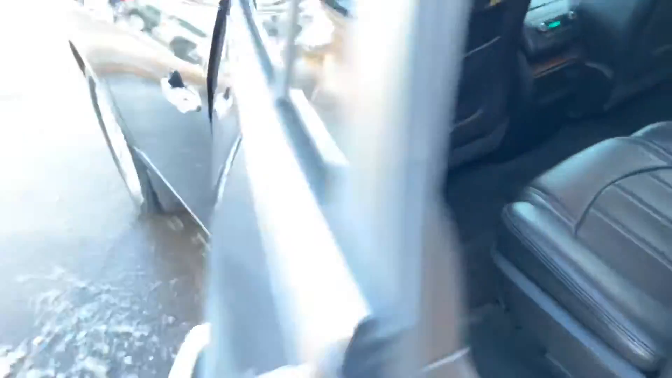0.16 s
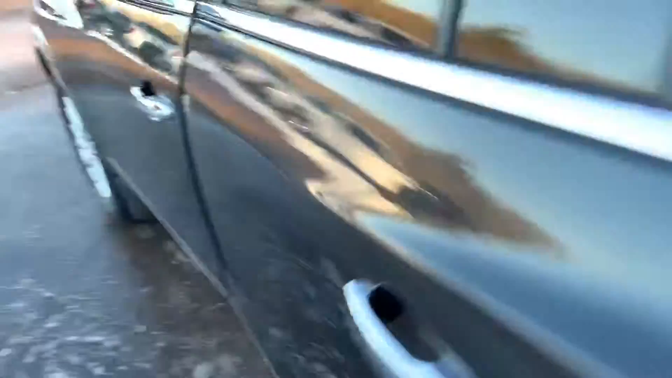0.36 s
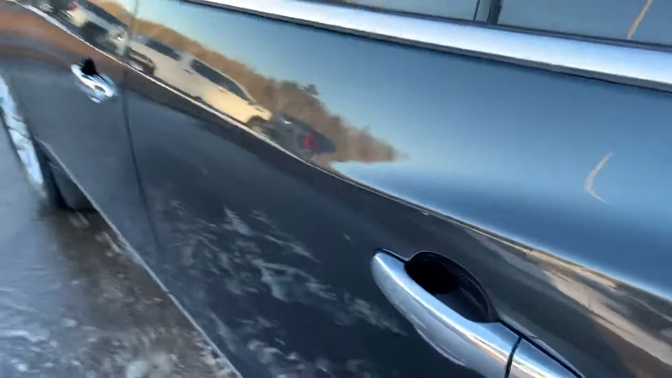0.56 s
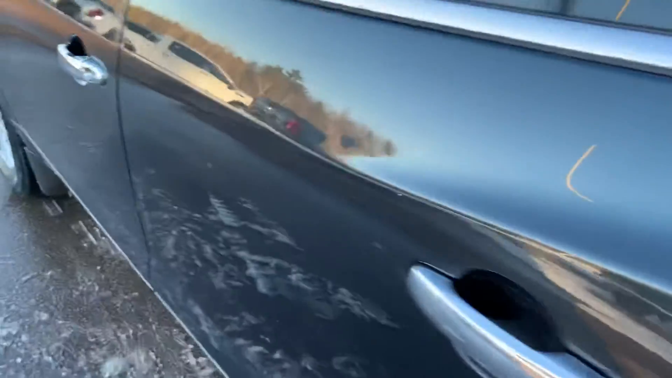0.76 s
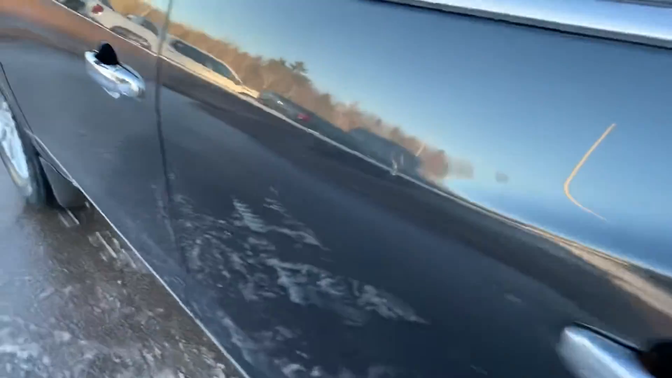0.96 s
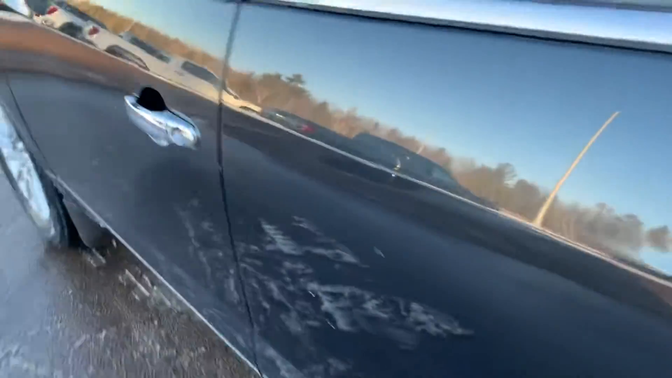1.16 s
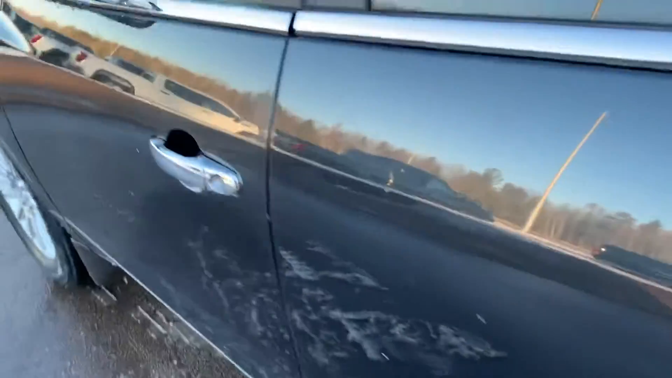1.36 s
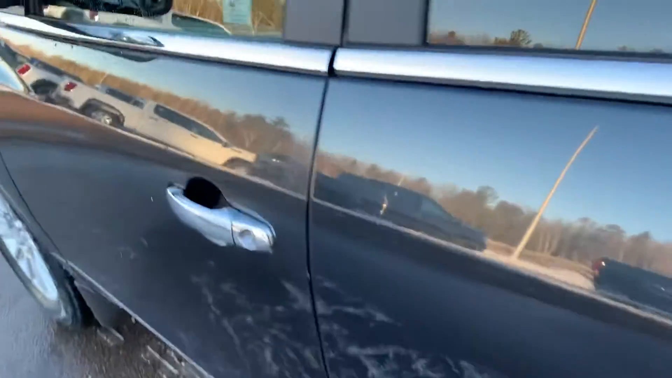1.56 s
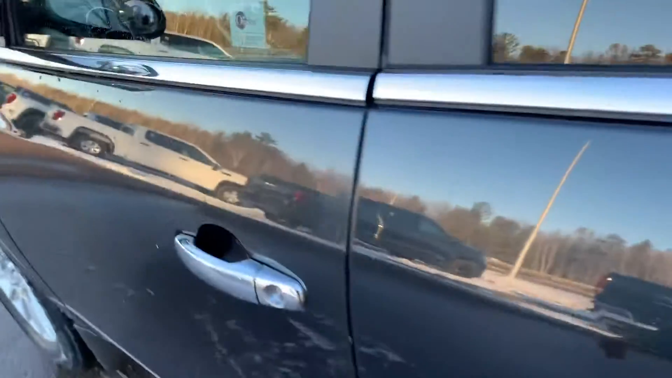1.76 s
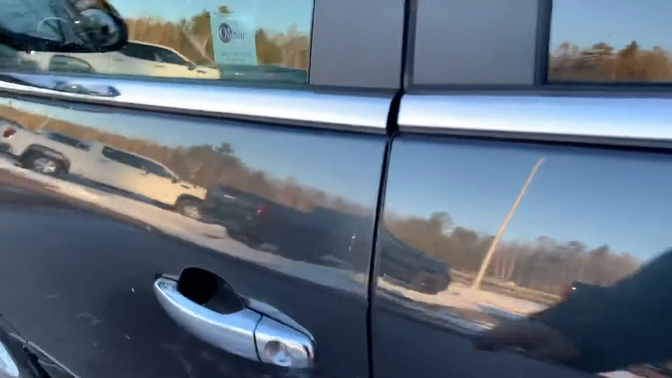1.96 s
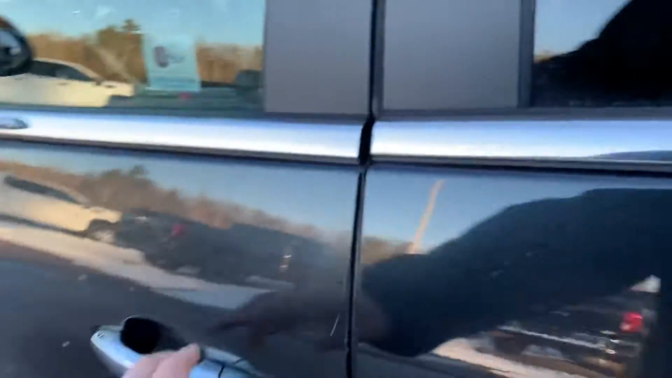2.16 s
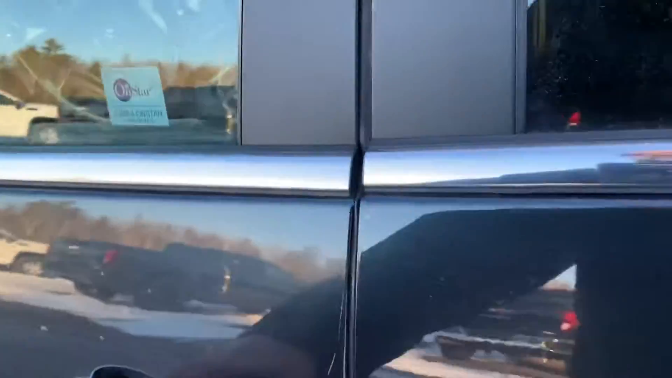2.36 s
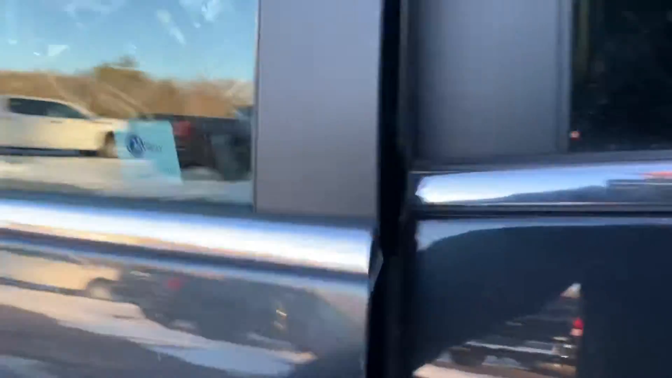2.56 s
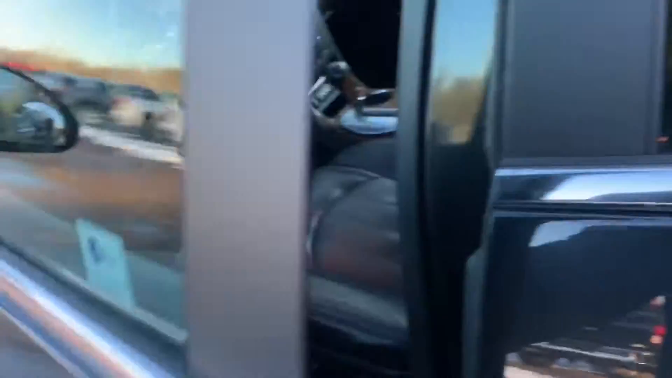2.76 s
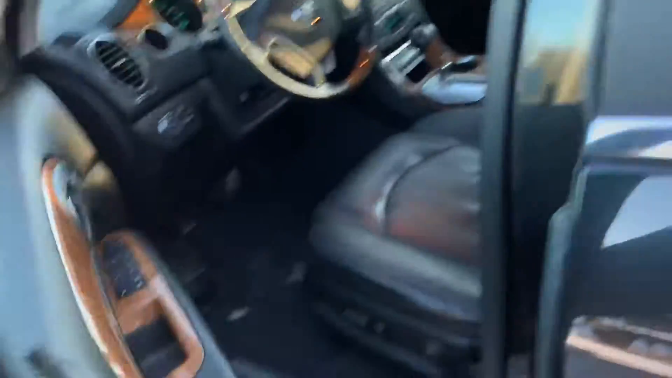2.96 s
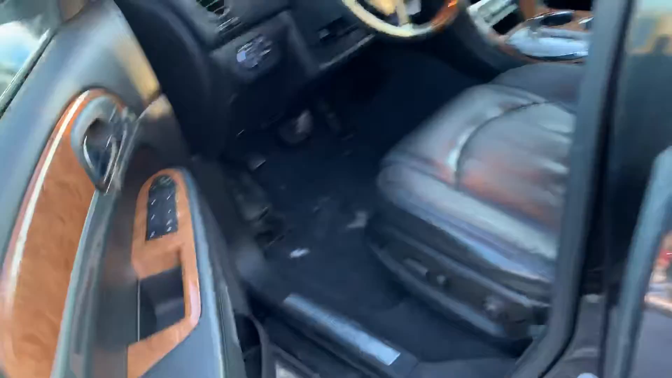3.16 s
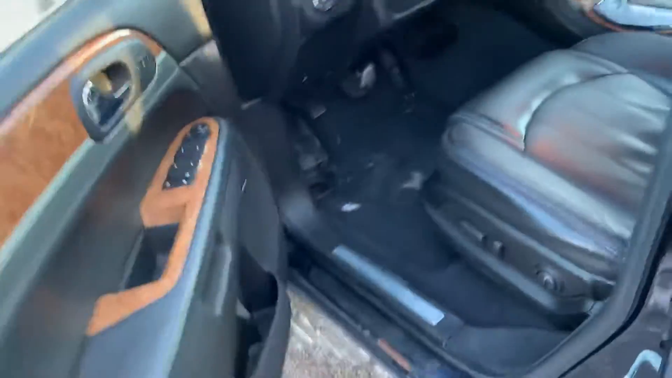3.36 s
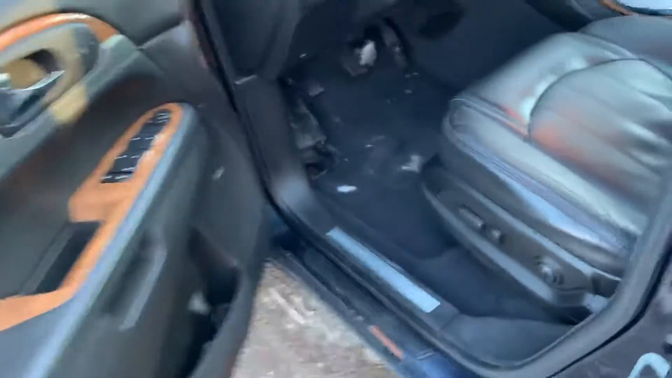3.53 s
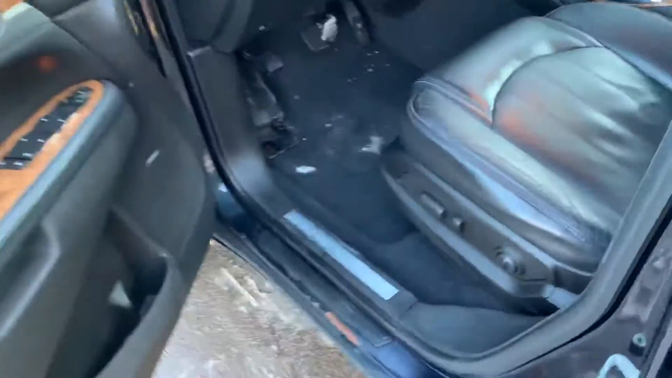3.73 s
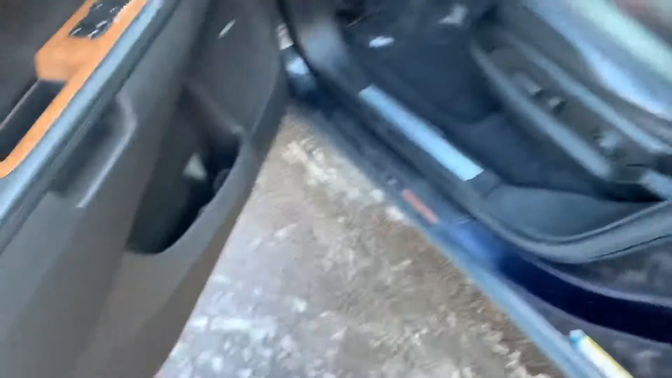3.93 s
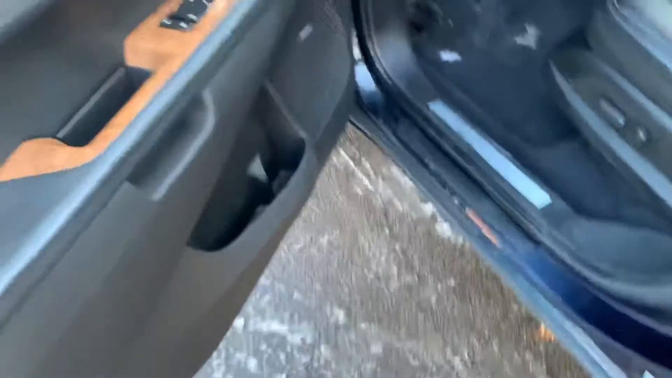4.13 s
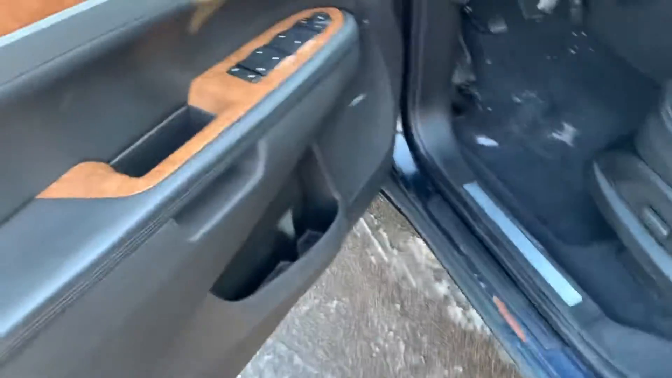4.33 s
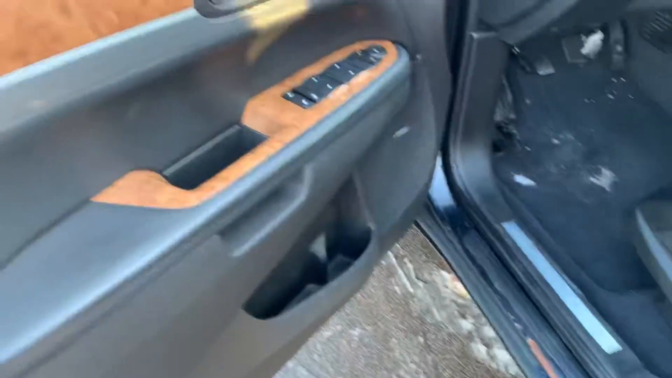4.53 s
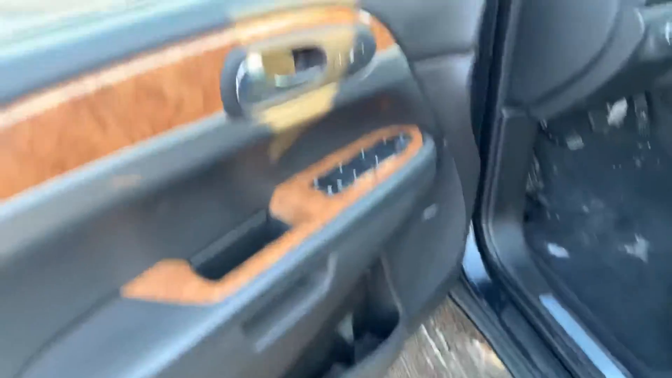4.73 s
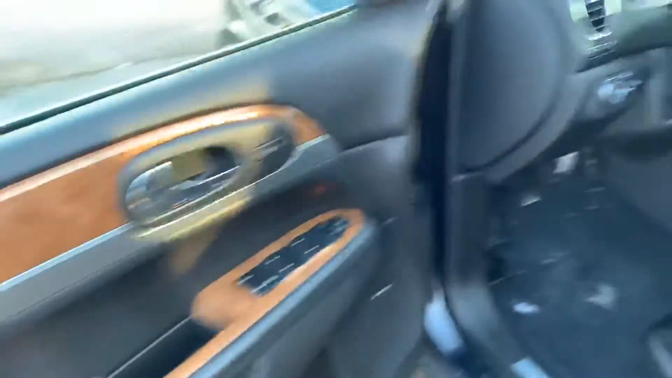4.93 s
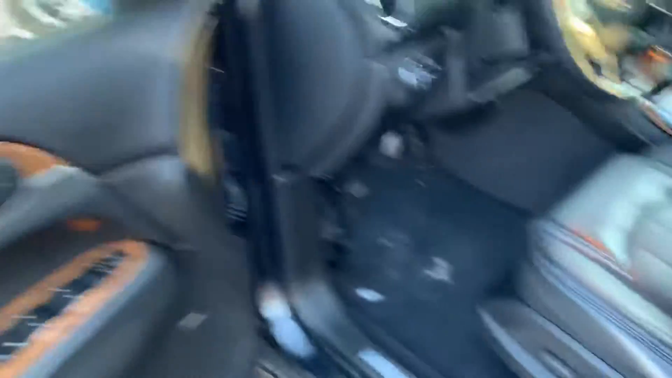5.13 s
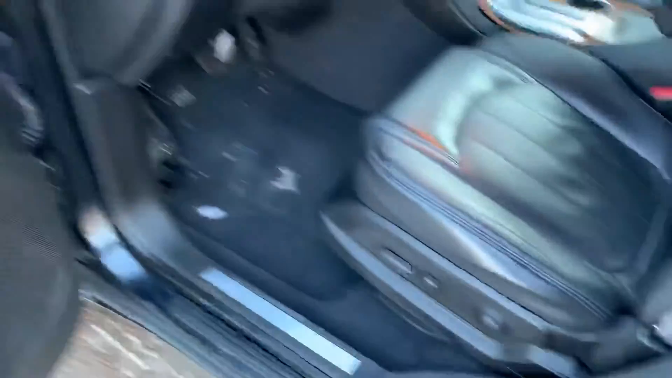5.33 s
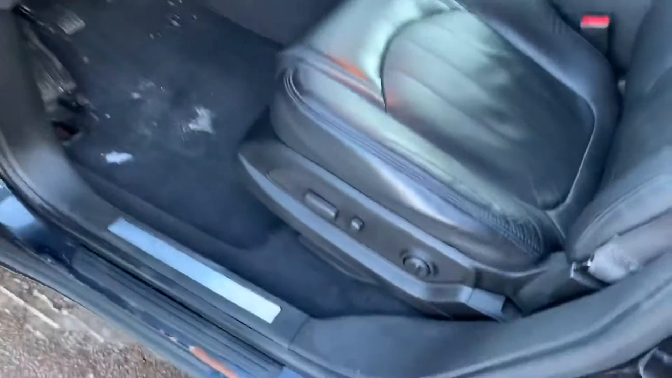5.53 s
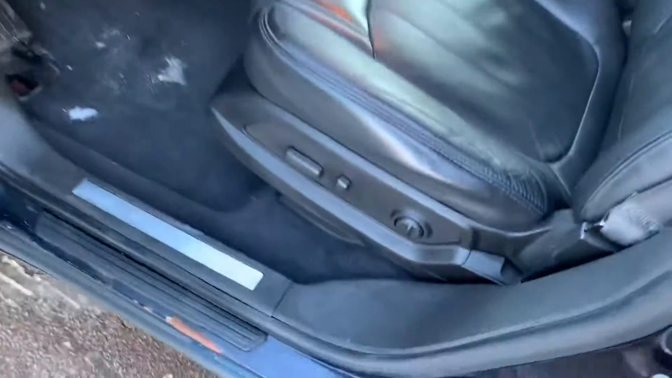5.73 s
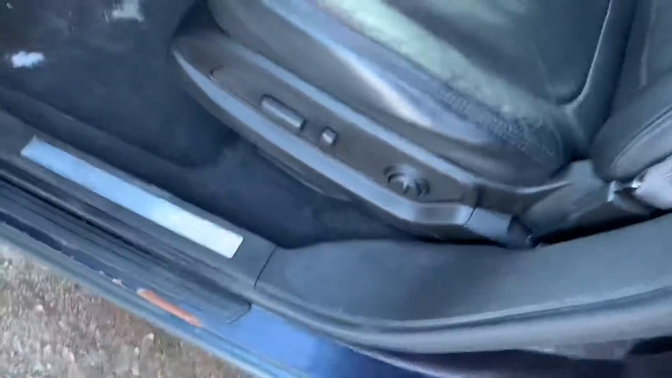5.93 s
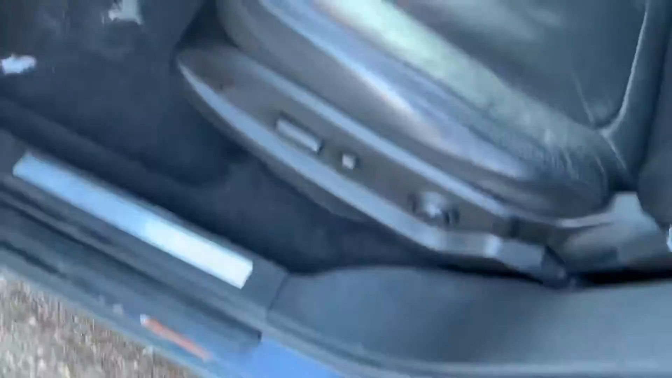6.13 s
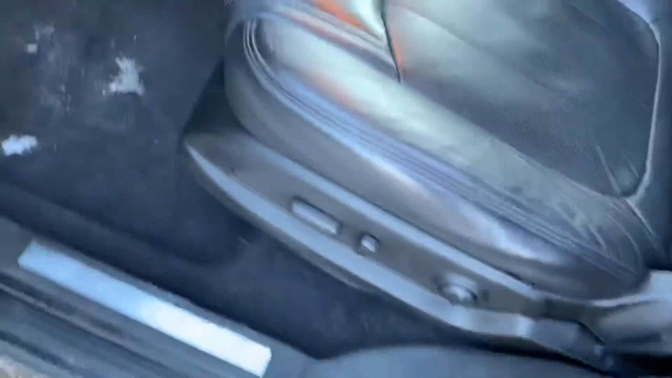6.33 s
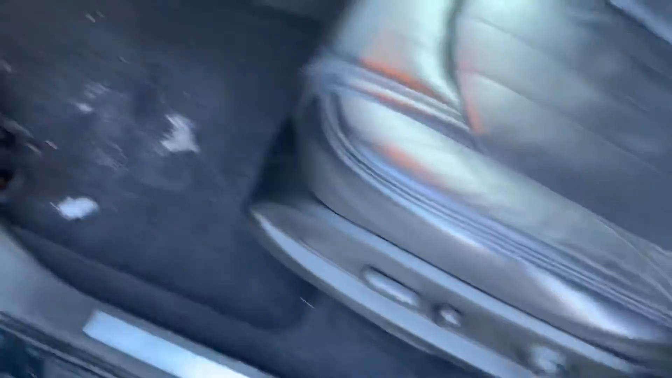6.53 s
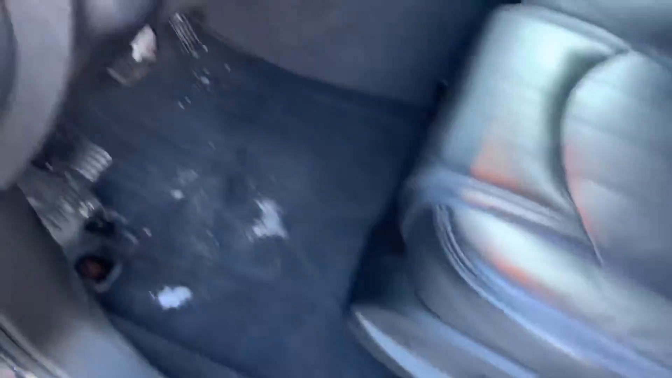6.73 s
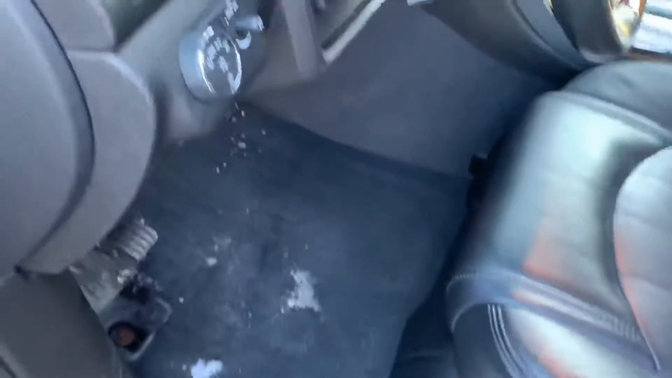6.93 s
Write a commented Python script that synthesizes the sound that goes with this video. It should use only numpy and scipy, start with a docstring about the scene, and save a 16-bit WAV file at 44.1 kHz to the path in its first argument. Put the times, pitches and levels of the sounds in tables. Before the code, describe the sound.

Over a low outdoor traffic rumble, one car door shuts heavily and another clicks open, followed by soft shoe and sleeve rustles.

```python
"""Far-off traffic rumbles and keys tick, then a car's rear door slams in an outdoor car park.
Each blow of the slam makes the door thud, ring and crack, and the car rebounds with a low boom.
Two seconds later the front door's steel latch snaps, the door swings open and the traffic booms
in the cabin. Shoes and sleeves rub and scuff. A phone beside the car hears it all in stereo."""
import sys
import numpy as np
from scipy import signal
from scipy.fft import rfft, irfft, next_fast_len
from scipy.io import wavfile
from scipy.ndimage import uniform_filter1d

SR = 44100
rng = np.random.default_rng(int(sys.argv[2]) if len(sys.argv) > 2 else 0)


def wrap_up_sound(samples):
    """Save the sound to the file named by the first command line argument, as 16-bit audio."""
    columns = np.atleast_2d(samples).T
    # keep every value between -1 and 1, then stretch to whole-number steps
    tamed = np.clip(columns, -1, 1)
    steps = np.round(tamed * 32767).astype(np.int16)
    wavfile.write(sys.argv[1], SR, steps)


N = 312357

# Blows on the doors. Each row: start in seconds, thud, panel ring, crack and the crack's extra
# treble in dB, favoured ring pitch in Hz, contact time in seconds.
DOOR_BLOWS = [(0.4896, -13, -14, -26, -11, 1400, 0.0023), (0.4953, -6.5, -6, -25, -10, 600, 0.0028),
              (0.4999, -16, -8, -21.5, -13, 1400, 0.0017), (0.504, -4, -0.5, -21, -6, 684, 0.0021),
              (0.508, -1.5, 3, -19, -2, 501, 0.0022), (0.514, -24, -13, -13.5, -1, 533, 0.0014),
              (0.521, -28, -24, -32, 2, 592, 0.0029), (0.535, -5, -12, -23, -12, 501, 0.0014),
              (0.5401, -18, -6, -30, -7, 480, 0.002), (0.5481, -11.5, -22, -37, 1, 638, 0.002),
              (0.5651, -20, -10, -30, -6, 1460, 0.00063), (0.583, -33, -27, -42, -1, 1500, 0.0025),
              (2.415, -27, -23, -45, 0, 900, .0015), (2.431, -18.5, -38, -49, 0, 530, 0.0024),
              (2.461, -10, -20, -54, 2, 500, 0.0026), (2.4656, -24, -15, -35, -13, 750, 0.0014),
              (2.472, -27, -24, -45, -4, 700, 0.0019), (2.484, -16.5, -29, -55, 0, 608, 0.0023),
              (2.519, -22, -35, -58, -2, 900, 0.0022), (2.9319, -21.5, -18, -50, 4, 560, 0.0025),
              (2.945, -22.5, -22, -54, 0, 500, 0.0042)]
# Cabin air and car body bouncing back. Each row: start in seconds, pitch in Hz, level in dB,
# seconds to swell, seconds to fade by 60 dB if the springs did not stop it.
REBOUNDS = [(.523, 58.3, 5, 0.051, 0.3), (0.521, 70.7, -0.5, 0.016, 0.25)]
# Snaps of the latch and the arm that holds the door. Each row: start in seconds, low ring,
# high ring, top ring and crack in dB, contact time in seconds.
LATCH_SNAPS = [(2.5517, -30, -38, -50, -43, 0.0031), (2.5745, -24, -21, -40, -35, 0.0025),
               (2.5827, -14.5, -18, -37, -28.5, 0.0019), (2.593, -17, -24, -50, -30, 0.00172),
               (2.926, -19, -15, -18.5, -22.5, 0.00097), (2.9317, -12.5, -15, -23, -25, 0.0011),
               (2.9357, -18, -35, -38, -37, 0.0018)]
# The tones each part rings with. Each row: pitch in Hz, level in dB, seconds to fade by 60 dB.
SHELL_TONES = [(115.5, 13.5, 0.19), (145.3, 7, 0.13), (170.3, 0, 0.21), (207, 5, 0.14), (280, 5.5, 0.19),
               (326, 0.5, 0.15), (377, -3.5, 0.11), (471, 2.5, 0.022), (512, -2.5, 0.044), (656, 1, 0.038)]
PANEL_TONES = [(430, -3, 0.035), (463, -1, 0.028), (600, 6.5, 0.041), (660, -3, .03), (730, -6, 0.024),
               (882, 4.5, 0.036), (1070, 7, 0.023), (1360, 9, 0.022), (1524, 12, 0.015), (1720, 3, 0.017),
               (1850, 1, 0.016), (2040, -6, 0.024), (2320, -16.5, 0.028), (2860, -9, 0.0084),
               (2920, -8, 0.012)]
LATCH_LOW_TONES = [(210.5, 4, 0.13), (433, -5, 0.019), (686, -7, 0.026), (950, 5, 0.024), (1066, 12, 0.016)]
LATCH_HIGH_TONES = [(1530, 4.5, 0.019), (1740, -3, 0.013), (1970, 4, 0.02), (2080, 4, 0.022),
                    (2530, 3.5, 0.014)]
LATCH_TOP_TONES = [(3500, -3, .008), (4150, -2, .008), (4700, 0, 0.008), (5450, -6, .008), (6190, -2, .008),
                   (6900, 1, 0.007)]
# Keys and plastic. Each row: start in seconds, jingle in dB, its pitch in Hz, treble and body in dB.
KEY_TICKS = [(0.0702, -36, 3870, -36.5, -60), (0.096, -35, 3880, -39, -60), (0.1265, -34, 4000, -38.5, -60),
             (0.1406, -38, 3800, -38, -60), (2.1863, -28, 3450, -44, -40), (2.216, -35, 4170, -48, -44),
             (2.2225, -36, 3500, -52, -40), (2.227, -41, 3500, -55, -46), (2.242, -37, 3700, -52, -50),
             (2.249, -30, 3800, -46, -42), (2.257, -32, 3500, -50, -50), (2.262, -36, 3900, -48, -50),
             (2.2732, -30, 3420, -29, -44), (2.282, -34, 3800, -34, -50), (2.287, -37, 3800, -44, -50),
             (2.2918, -25, 3650, -33, -38), (2.4, -43, 3600, -38, -50), (3.7646, -34, 3470, -47, -55),
             (6.583, -29, 3360, -37, -42)]
# Shoes and sleeves. Each row: start, rise, hold and fall in seconds, level of the airy sheen in dB,
# rasp and crunch in dB compared with the sheen, crunch pitch in Hz.
RUBS = [(0.226, 0.033, 0.13, 0.037, -47, -5, -9, 2120), (0.766, 0.0089, 0.078, .02, -49.5, -8, -4.5, 2000),
        (0.967, 0.0072, 0.098, 0.038, -47.5, -4.5, -9, 1960),
        (1.087, 0.026, 0.09, 0.059, -55, -2.5, 4, 1600), (1.631, 0.016, 0.064, 0.097, -43, -3.5, -3, 2030),
        (1.682, 0.018, 0.049, 0.014, -60, 6, 2, 2000), (1.775, 0.038, 0.049, 0.022, -47.5, -4, -21, 2000),
        (2.087, 0.011, 0.014, 0.025, -34, -3.5, -1.5, 1700),
        (2.103, 0.0094, 0.026, 0.044, -32.5, -2.5, -5.5, 2330),
        (2.193, 0.037, 0.06, 0.031, -49, 2, -5, 1700), (2.292, 0.012, 0.026, 0.075, -48.5, 0, -1, 1800),
        (2.344, 0.057, .008, .03, -51.5, 3.5, -5, 2010), (2.436, .012, .008, 0.044, -46.5, -6, -10, 2000),
        (3.043, 0.063, 0.52, .3, -69.5, -7, 20.5, 1210), (3.262, 0.092, .02, .14, -47.5, 0.5, -10, 1400),
        (3.53, .04, .08, .06, -69, -3, 19, 1240), (4.596, 0.12, 0.055, 0.47, -57.5, 3, -4, 2000),
        (5.737, 0.024, 0.027, 0.023, -34.5, -2.5, -4, 1400),
        (5.799, 0.012, 0.013, 0.032, -43.5, 1, 6, 1430), (5.904, 0.033, 0.089, .02, -51.5, -3, -2, 2430),
        (6.035, 0.013, 0.031, 0.13, -48, -5, -11, 2020), (6.49, 0.025, 0.009, 0.044, -46, -9, -2, 2040),
        (6.563, 0.031, .015, 0.19, -47, 3, 2.5, 2120), (6.93, 0.035, 0.05, .04, -47, -5, -14, 2000)]
# The crunch of a scuff. Each row: multiple of the crunch pitch, level in dB.
CRUNCH_SHAPE = [(.5, -10), (.68, -5), (.8, -1), (.9, 1), (1, 4), (1.15, -3), (1.28, -6), (1.45, -8)]
# Tone colours of the nearby noises. Each row: frequency in Hz, relative level in dB.
CRACK_COLOUR = [(2200, 8), (2900, 1), (3800, 4.5), (4500, 1.5), (5500, -3.5), (7000, 0), (11000, -2.5),
                (16500, -2)]
ECHO_COLOUR = [(300, -0.5), (900, -7.5), (2500, -6), (4300, -5), (8000, -14), (16000, -20)]
TICK_TREBLE_COLOUR = [(4500, 2), (7000, 3), (16500, -4.5)]
TICK_BODY_COLOUR = [(900, 2), (1500, -5), (2500, -4)]
SHEEN_COLOUR = [(6500, -21), (8200, -2.5), (12000, -1.5), (16500, -1.5)]
RASP_COLOUR = [(3300, 2.5), (3800, 1.5), (4250, 2.5), (4800, -5.5), (5900, -8), (6400, -7), (6900, -3),
               (8200, -20)]
# Tone colours of the six traffic layers. Each row: frequency in Hz, relative level in dB.
RUMBLE_COLOUR = [(22, -19), (40, -9), (68, 0), (100, -1.5), (140, -18.5), (220, -43)]
LOW_BOOM_COLOUR = [(85, -3.5), (110, 1.5), (165, 3), (210, -5.5), (270, -16.5)]
CABIN_COLOUR = [(170, -9), (220, 2), (280, 0), (340, -2.5), (400, -7.5), (520, -18)]
ROAR_COLOUR = [(300, -19), (500, 0), (700, -3), (1000, -8.5), (1400, -5), (1900, -10), (2500, -13.5),
               (3300, -22), (5000, -22), (6500, -39)]
WHINE_COLOUR = [(650, -3.5), (800, 0), (880, 0), (945, 3), (1010, -3.5), (1200, -8)]
HISS_COLOUR = [(2000, 8), (5000, -5), (6800, -1), (7600, -8.5), (8200, -6), (12000, -7.5), (16500, -5.5)]
# Those layers in order. Each row: dB with doors shut, dB added by an open rear and an open front door.
TRAFFIC_LEVELS = [(-32, -8, -3.5), (-40.5, 13.5, 5), (-49, 6.5, 11), (-47, -3, 5.5), (-43.5, -3.5, -2),
                  (-56, -7.5, 7.5)]
# How the traffic changes. Each row: time in seconds, rear and front door opening from 0 to 1,
# overall swell, extra rumble and extra cabin boom in dB.
DOORS_AND_SWELLS = [(0.0, 0.77, 0.33, 3.5, -5, -4), (0.35, 0.17, 0.3, 0, -0.5, -3),
                    (0.5, 0.2, 0.1, 3.5, -2.5, -1.5), (1.0, 0.07, 0.07, 1, 1, -1.5),
                    (1.6, 0.08, 0, 1.5, 1, 0), (2.1, 0, 0.72, -0.5, 1, -4.5),
                    (2.45, 0.27, 0.03, 3.5, -4.5, -1), (2.8, 0.1, 0.41, -0.5, -2, 6.5),
                    (3.2, 0.09, 0.84, 2, -2, 2.5), (3.65, 0, 0.66, 1, -3, 2.5),
                    (4.0, 0.04, 0.85, 0.5, -2, -2.5), (4.35, 0.1, 0.93, 0, 3.5, 0.5),
                    (4.8, 0.01, 1, -2, 1, -1.5), (5.2, 0.07, 0.94, 0, 2.5, -3.5),
                    (5.6, 0.1, 0.83, 0.5, 0, -0.5), (5.9, 0.12, 0.99, .5, 4, -2),
                    (6.3, 0, 0.91, 1, 0.5, 0.5), (6.7, 0, 1, 1.5, 3, -1.5), (7.08, 0.14, 0.8, 2.5, -5, 3)]
# How alike the phone's two microphones hear a source. Each row: frequency in Hz, likeness from 0 to 1.
DOOR_LIKENESS = [(60, 1), (300, 1), (600, 0.17), (2500, 0.29), (6500, 0.42), (7800, 1), (17000, 0.83)]
SCUFF_LIKENESS = [(60, 1), (600, .8), (2500, .8), (3500, .93), (4500, .8), (6500, .7), (7800, 1),
                  (17000, 1)]
GENERAL_LIKENESS = [(60, 0.96), (200, 0.95), (350, 0.79), (600, 0.26), (2500, 0), (6500, 0.01), (7800, 1),
                    (17000, 1)]
# How far the right microphone's wave leads the left. Each row: frequency in Hz, phase in radians.
RIGHT_PHASE = [(60, 0), (430, -.5), (860, -3.4), (1500, -5.4), (2800, -6.6), (3300, -9.6)]

SETTLE_S = 0.18  # the springs stop the rebound after about this long
TOUCH_DB, TOUCH_S = -9, .00012  # the clean touch in a knock: level against the rattle, length
ECHO_DB, ECHO_FADE_S = -12., .15
TICK_CONTACT_S, JINGLE_FADE_S = .0016, 0.021
SCUFF_FADE_DB = 18  # a scuff starts and ends this far below its full level
PATCH_DB, PATCH_HZ, PATCH_S = 1.8, 130, .06  # patches in the traffic: depth, width, length
PHASE_CYCLE_HZ, IN_PHASE_HZ = 5050, 11000  # treble reaches the right microphone 0.2 ms early
DOOR_RIGHT_DB, LEFT_DB = 1, -0.44  # level of that side against the other
PEAK_LIMIT, TOP_HZ = .95, 15780


def door():
    """Each blow makes the door's shell thud, its panel ring and its surface crack."""
    out, t = np.zeros((2, N)), times(.25)
    # neighbouring tones swing against each other
    shell = sum((-1) ** k * ring([tone], t) for k, tone in enumerate(SHELL_TONES))
    push = np.diff(t * np.exp(-t / 0.00069), prepend=0)  # the rubber seal softens the blow
    thud = excite(push * np.ones((2, 1)), shell)
    for start, thud_db, ring_db, crack_db, treble_db, centre_hz, contact in DOOR_BLOWS:
        noise = rng.standard_normal((2, len(t)))
        # where the blow lands favours the tones near one pitch
        tones = [(hz, db - 5.2 * abs(np.log2(hz / centre_hz)), fade) for hz, db, fade in PANEL_TONES]
        panel = excite(knock(noise, contact, t), ring(tones, t))
        crack_colour = [(hz, db + treble_db * (hz > 5000)) for hz, db in CRACK_COLOUR]
        crack = rattle(unit(colour(noise, crack_colour)), contact, t)
        add(out, start, gain(thud_db) * thud + gain(ring_db) * panel + gain(crack_db) * crack)
    return out


def rebound():
    """The cabin air and car body swing after the slam until the springs stop them."""
    out, t = np.zeros((2, N)), times(.6)
    settle = np.exp(-(t / SETTLE_S) ** 4)
    for start, hz, db, swell, fade in REBOUNDS:
        rise = 1 - np.exp(-t / swell)
        add(out, start, rise * settle * ring([(hz, db, fade)], t))
    return out


def latch():
    """Small steel parts snap over with a crack and ring briefly."""
    out, t = np.zeros((2, N)), times(.1)
    rings = [ring(tones, t) for tones in (LATCH_LOW_TONES, LATCH_HIGH_TONES, LATCH_TOP_TONES)]
    for start, *ring_dbs, crack_db, contact in LATCH_SNAPS:
        noise = rng.standard_normal((2, len(t)))
        snap = knock(noise, contact, t)
        ringing = sum(gain(db) * excite(snap, part) for db, part in zip(ring_dbs, rings))
        crack = rattle(unit(colour(noise, CRACK_COLOUR)), contact, t)
        add(out, start, ringing + gain(crack_db) * crack)
    return out


def with_echo(sound):
    """Trim, glass and the cars alongside answer each blow with a short, dense echo."""
    t = times(.3)
    tail = colour(rng.standard_normal((2, len(t))), ECHO_COLOUR)
    tail *= (1 - np.exp(-t / 0.0019)) * 1000 ** (-t / ECHO_FADE_S)
    tail /= np.sqrt(np.sum(tail ** 2) / 2)
    return sound + gain(ECHO_DB) * signal.fftconvolve(sound, tail, axes=1)[:, :N]


def keys():
    """Keys and bits of plastic click: a two-tone jingle, bright treble and a duller body."""
    out, t = np.zeros((2, N)), times(.04)
    for start, db, hz, treble_db, body_db in KEY_TICKS:
        noise = rng.standard_normal((2, len(t)))
        tones = [(hz, 0, JINGLE_FADE_S), (1.09 * hz, -5, JINGLE_FADE_S)]
        jingle = excite(knock(noise, TICK_CONTACT_S, t), ring(tones, t))
        treble = gain(treble_db) * unit(colour(noise, TICK_TREBLE_COLOUR))
        body = gain(body_db) * unit(colour(noise, TICK_BODY_COLOUR))
        add(out, start, gain(db) * jingle + rattle(treble + body, TICK_CONTACT_S, t))
    return out


def scuffs():
    """Shoes and sleeves rub in tiny uneven grains, heard as a sheen, a rasp and a crunch."""
    grain_db = 2.6 * (np.minimum(rng.exponential(size=N), 3) - 1)
    grains = gain(grain_db + .8 * wander(150)) * rng.standard_normal((2, N))
    out = np.zeros((2, N))
    for start, rise, hold, fall, db, rasp_db, crunch_db, crunch_hz in RUBS:
        corners = np.cumsum([0, rise, hold, fall])
        t, first = times(corners[-1]), int(start * SR)
        rub = grains[:, first:first + len(t)]
        crunch_colour = [(crunch_hz * multiple, level) for multiple, level in CRUNCH_SHAPE]
        sheen, rasp, crunch = (unit(colour(rub, c)) for c in (SHEEN_COLOUR, RASP_COLOUR, crunch_colour))
        fade_db = np.interp(t, corners, [-SCUFF_FADE_DB, 0, 0, -SCUFF_FADE_DB])
        add(out, start, gain(db + fade_db) * (sheen + gain(rasp_db) * rasp + gain(crunch_db) * crunch))
    return out


def traffic():
    """Distant engines and tyres as six flickering noises; open doors change their balance."""
    when, *columns = np.transpose(DOORS_AND_SWELLS)
    rear, front, swell_db, rumble_db, cabin_db = (np.interp(np.arange(N) / SR, when, c) for c in columns)
    # each noise: colour, flickers per second, flicker depth in dB
    noises = [(RUMBLE_COLOUR, 9, 1.5), (LOW_BOOM_COLOUR, 12, 1.5), (CABIN_COLOUR, 14, 1.2),
              (ROAR_COLOUR, 14, .7), (WHINE_COLOUR, 10, 1.5), (HISS_COLOUR, 8, .5)]
    layers = []
    for (db, rear_db, front_db), (points, rate, flicker_db) in zip(TRAFFIC_LEVELS, noises):
        noise = unit(colour(rng.standard_normal((2, N)), points))
        level_db = db + rear_db * rear + front_db * front + swell_db + flicker_db * wander(rate)
        layers.append(gain(level_db) * noise)
    rumble, boom, cabin, roar, whine, hiss = layers
    return gain(rumble_db) * rumble + boom + gain(cabin_db) * cabin + whine + patchy(roar + hiss)


def patchy(sound):
    """Narrow bands of pitch swell and sink on their own, alike on both sides."""
    hz, when, frames = signal.stft(sound, SR, nperseg=1024)
    patches = rng.standard_normal((len(hz), len(when)))
    patches = uniform_filter1d(patches, int(PATCH_HZ / hz[1]) + 1, axis=0)
    patches = uniform_filter1d(patches, int(PATCH_S / (when[1] - when[0])) + 1, axis=1)
    return signal.istft(frames * gain(PATCH_DB * unit(patches)), SR, nperseg=1024)[1][:, :N]


def microphones(pair, likeness):
    """Two close microphones share the bass and top treble, but little or only part of the middle."""
    size = next_fast_len(N)
    hz = np.fft.rfftfreq(size, 1 / SR)
    left, other = rfft(pair, size)
    alike = np.clip(value_at(likeness, hz), 0, 1)
    treble_phase = 2 * np.pi * (hz - IN_PHASE_HZ) / PHASE_CYCLE_HZ
    phase = np.where(hz < RIGHT_PHASE[-1][0], value_at(RIGHT_PHASE, hz), treble_phase)
    right = alike * left * np.exp(1j * phase) + np.sqrt(1 - alike ** 2) * other
    return irfft(np.array([left, right]), size)[:, :N]


def rattle(noise, contact, t):
    """Many tiny contacts press hardest at the contact time, then let go."""
    return noise * t / contact * np.exp(1 - t / contact)


def knock(noise, contact, t):
    """A rattle with one clean touch where the pressure peaks."""
    burst = rattle(noise, contact, t)
    touch = np.exp(-((t - contact) / TOUCH_S) ** 2)
    equal_energy = np.sqrt(np.sum(burst ** 2) / 2 / np.sum(touch ** 2))
    return burst + gain(TOUCH_DB) * equal_energy * touch


def ring(tones, t):
    """The fading tones of a part after one sharp tap."""
    return sum(gain(db) * np.sin(2 * np.pi * hz * t) * 1000 ** (-t / fade) for hz, db, fade in tones)


def excite(force, ringing):
    """A force sets a part ringing; the result peaks at 1."""
    sound = signal.fftconvolve(force, ringing[None], axes=1)[:, :len(ringing)]
    return sound / np.abs(sound).max()


def colour(x, points):
    """Give x a tone colour that drops 30 dB in the octave past each end."""
    hz = np.fft.rfftfreq(x.shape[-1], 1 / SR)
    below = (points[0][0] / 2, points[0][1] - 30)
    above = (points[-1][0] * 2, points[-1][1] - 30)
    return irfft(rfft(x) * gain(value_at([below, *points, above], hz)), x.shape[-1])


def value_at(points, hz):
    """Read between the rows of a frequency table, on a pitch scale."""
    frequencies, values = np.transpose(points)
    return np.interp(np.log(hz + 1), np.log(frequencies), values)


def wander(rate):
    """A smooth random drift of about 1 either way, with rate new values a second."""
    hold = int(SR / rate)
    steps = np.repeat(rng.standard_normal(N // hold + 1), hold)
    return 1.3 * uniform_filter1d(uniform_filter1d(steps, hold), hold)[:N]


def add(out, start, x):
    """Mix x into out from start seconds on."""
    first = int(start * SR)
    out[..., first:first + x.shape[-1]] += x[..., :N - first]


def times(seconds):
    """The time of each sample."""
    return np.arange(int(seconds * SR)) / SR


def gain(db):
    """Turn decibels into a multiplier."""
    return 10 ** (np.asarray(db) / 20)


def unit(x):
    """Scale to an average (rms) level of 1."""
    return x / np.sqrt(np.mean(x ** 2))


def scene():
    """All sources reach both microphones; the doors are nearer the right one."""
    car = microphones(with_echo(door() + rebound() + latch()), DOOR_LIKENESS)
    car *= gain(DOOR_RIGHT_DB * np.array([[-.5], [.5]]))
    road = microphones(traffic(), GENERAL_LIKENESS)
    rubbing = microphones(scuffs(), SCUFF_LIKENESS)
    ticking = microphones(keys(), GENERAL_LIKENESS)
    return car + ticking + rubbing + road


def record(dry):
    """The phone leans a little to the right, rounds the loudest peaks and cuts the highest treble."""
    tilted = dry * gain(LEFT_DB * np.array([[.5], [-.5]]))
    rounded = np.tanh(tilted / PEAK_LIMIT) * PEAK_LIMIT
    return signal.sosfilt(signal.ellip(10, .2, 80, TOP_HZ, fs=SR, output="sos"), rounded)


dry = scene()
out = record(dry)
wrap_up_sound(out)
```